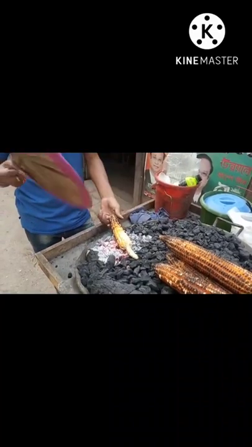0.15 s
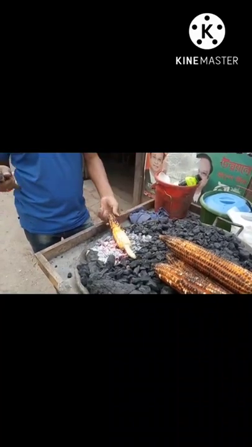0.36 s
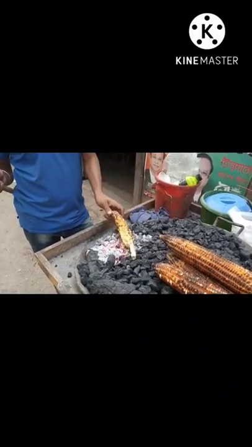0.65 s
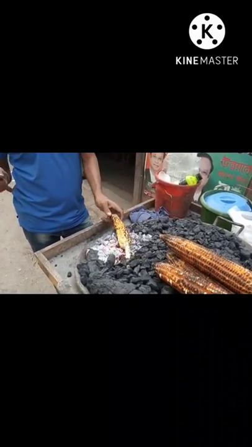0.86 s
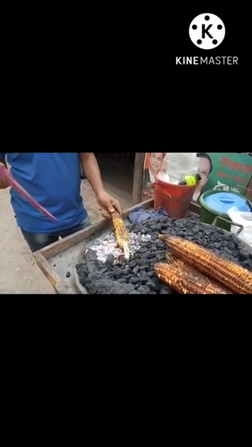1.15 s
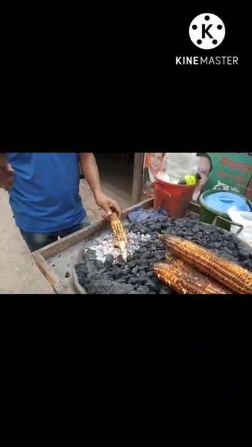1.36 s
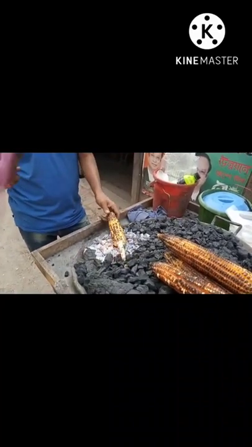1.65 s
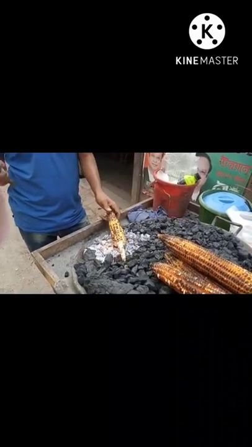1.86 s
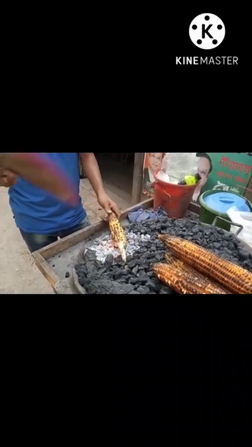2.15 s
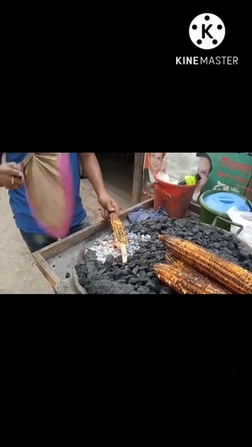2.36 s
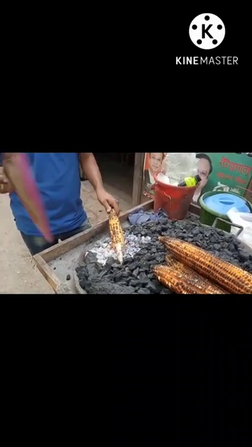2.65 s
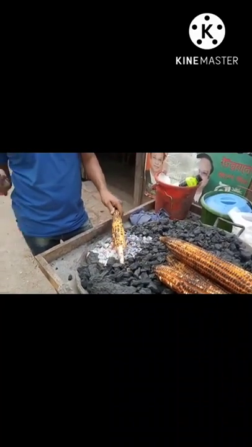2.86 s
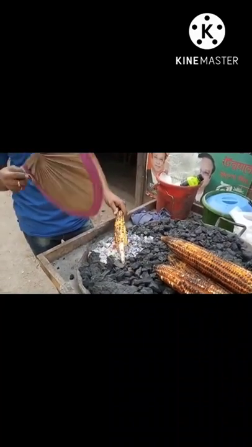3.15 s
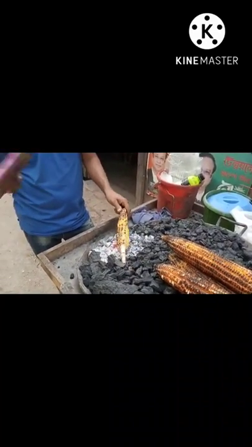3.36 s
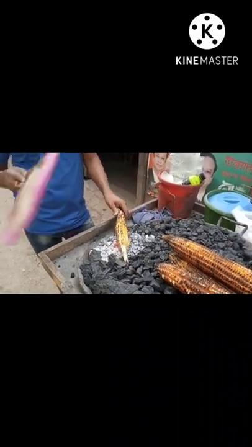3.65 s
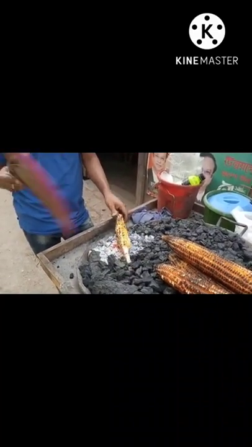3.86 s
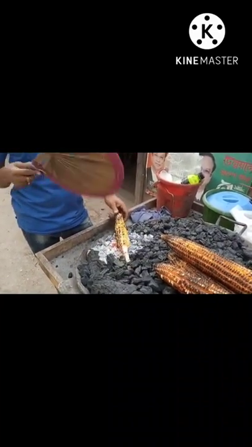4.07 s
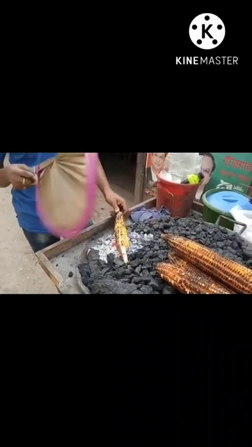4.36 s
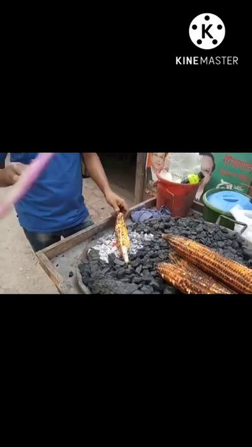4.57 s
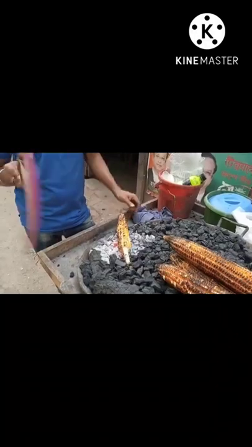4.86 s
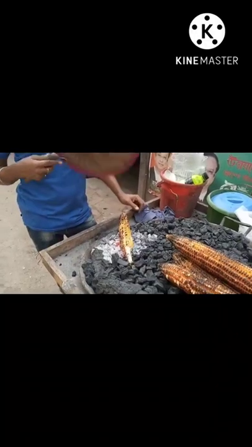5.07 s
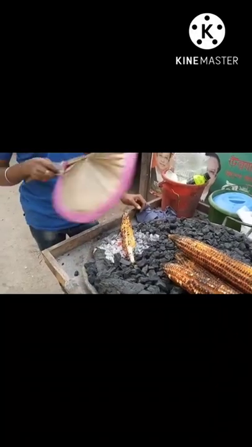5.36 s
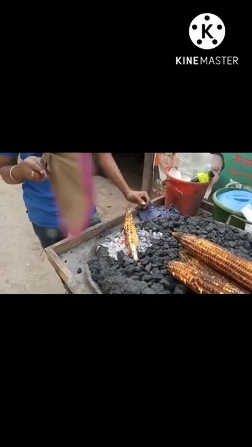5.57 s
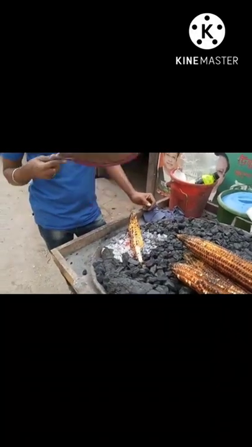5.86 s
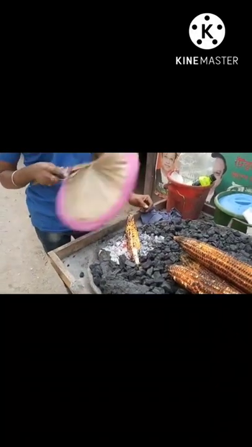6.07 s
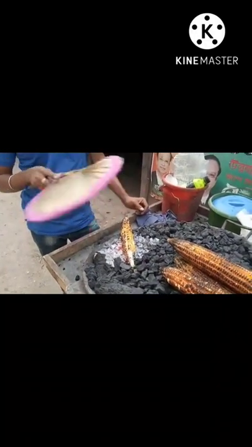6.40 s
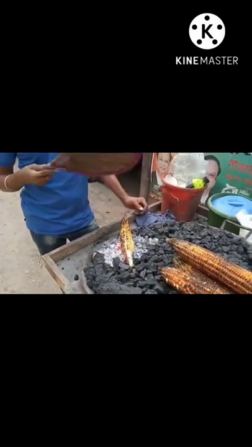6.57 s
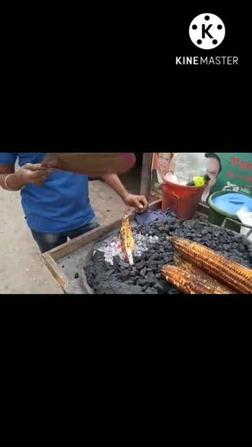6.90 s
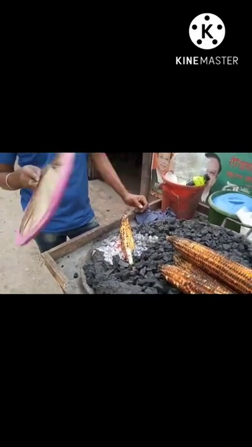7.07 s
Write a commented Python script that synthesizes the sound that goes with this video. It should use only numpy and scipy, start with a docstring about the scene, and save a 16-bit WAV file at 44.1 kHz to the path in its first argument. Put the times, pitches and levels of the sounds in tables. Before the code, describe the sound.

A hand fan clacks irregularly over hot charcoal that pops and crackles, with a soft hiss and faint street rumble.

```python
"""A street stall, where a corn cob roasts on charcoal and a hand fan is swung over the coals.
The blade clacks on its handle with a puff of air at each turn; lumps split with sharp, ringing pops
and the embers crackle. Underneath sit a soft hiss, street rumble and the fan's draught on the microphone.
The stall's walls add a short tail. Near the first second the sound drops out briefly."""
import sys
import numpy as np
from scipy import signal
from scipy.io import wavfile
from scipy.ndimage import map_coordinates

SR = 44100
rng = np.random.default_rng(int(sys.argv[2]) if len(sys.argv) > 2 else 0)


def dump(signal):
    """Clip the signal to [-1, 1] and save it as 16-bit WAV at the path in sys.argv[1]."""
    limited = np.clip(np.atleast_2d(signal).T, -1, 1)
    pcm = np.round(limited * 32767).astype(np.int16)
    wavfile.write(sys.argv[1], SR, pcm)


N = 319284

# strokes of the fan: start_s, contact_hz, knock_db, puff_db, snap_db
FAN_STROKES = [(0.1553, 1484, -34.5, -31.5, -36.5), (1.0718, 3620, -36, -45, -42.5),
               (1.1243, 3160, -32, -38, -46), (1.222, 3500, -25.5, -31.5, -33.5),
               (1.3828, 1840, -33.5, -30, -42.5), (2.078, 2730, -29, -31.5, -35.5),
               (2.4953, 3970, -35, -38, -40), (2.9549, 2340, -47.5, -54.5, -57),
               (3.176, 3200, -44, -48.5, -50), (3.2707, 1800, -32.5, -48, -37),
               (3.5016, 4130, -31.5, -29, -41), (3.5863, 2410, -39, -43, -43.5),
               (4.3548, 3370, -24, -25.5, -27.5), (4.9575, 3430, -29, -37, -36.5),
               (5.2077, 2300, -29.5, -26, -34), (5.5257, 1830, -38, -39, -44),
               (5.5339, 4050, -33, -34, -34), (6.4426, 2410, -30, -26, -34),
               (6.6425, 1220, -31.5, -27, -38), (6.8867, 3500, -30, -38, -47),
               (6.8993, 4200, -26, -32.5, -27.5)]
# undamped modes of the fan's handle: pitch_hz, gain_db, t60_s
HANDLE_MODES = [(1026, 12, 0.32), (1605, 4.5, 0.025), (1852, -6, 0.1), (2082, 12.5, 0.039), (2602, 7, 0.19),
                (3313, -7, 0.039), (3620, 15.5, 0.25), (4050, 3.5, 0.049), (4840, 2, 0.015),
                (5477, 10, 0.095), (6300, -7, 0.048), (6480, -1, 0.071), (8700, 2.5, 0.044),
                (9950, 3.5, 0.011)]
# low modes of the blade and the stall's box: pitch_hz, gain_db, t60_s
BOOM_MODES = [(98.7, -24.5, 0.39), (176.3, -18, 0.061), (199.5, -17.5, 0.26), (317.6, -23, 0.088)]
# foreground charcoal pops: start_s, fragment_hz, ring_db, crack_db
COAL_POPS = [(1.336, 2100, -38.5, -72), (1.4121, 3630, -35, -36), (1.4259, 2090, -53, -36),
             (1.4681, 1750, -30, -65), (1.5008, 5560, -23.5, -27.5), (1.6221, 4030, -43.5, -70),
             (2.1165, 3560, -27.5, -24), (2.141, 4930, -25.5, -34), (2.1509, 4070, -25.5, -29.5),
             (2.1746, 4400, -27.5, -31), (2.2447, 4500, -22, -22.5), (2.2825, 2030, -31, -43.5),
             (2.374, 2130, -30, -39), (2.6025, 4620, -37.5, -57), (2.6183, 5550, -39.5, -60),
             (2.9072, 2070, -34, -50), (3.0891, 2530, -58, -50), (3.3725, 2380, -46, -55),
             (3.466, 2260, -52, -47), (3.6273, 1680, -39.5, -68), (3.7142, 7560, -40.5, -46),
             (3.835, 1680, -50, -55), (4.2335, 2450, -48, -58.5), (4.5846, 2540, -40, -37),
             (4.6516, 4600, -30.5, -37), (4.694, 4950, -37.5, -72), (5.062, 1530, -42.5, -61),
             (4.7747, 6100, -48.5, -49), (5.084, 4400, -43, -48), (5.125, 2970, -45, -52),
             (5.3934, 1420, -42, -58), (5.4153, 4500, -46, -46), (5.2397, 1350, -22.5, -32.5),
             (5.2632, 1040, -32.5, -38), (5.2973, 1650, -43, -35), (5.3083, 2200, -36, -48),
             (5.35, 2100, -37.5, -37), (5.4294, 1760, -37.5, -66), (5.4475, 1930, -37.5, -47),
             (5.657, 1680, -42.5, -48), (5.7172, 1920, -41, -46), (5.7464, 1570, -45, -51),
             (5.852, 4100, -34, -66), (6.0532, 1940, -49, -56), (6.1729, 5800, -47, -70),
             (6.3684, 1920, -43, -59), (6.5032, 1950, -40, -58), (6.5652, 2460, -42.5, -44.5),
             (6.6609, 4180, -17.5, -19), (6.706, 4330, -32, -49), (6.724, 4500, -36, -35.5),
             (6.82, 2120, -36, -36), (6.9776, 4800, -30, -36.5), (7.0072, 4630, -35.5, -47.5),
             (7.069, 1780, -40.5, -47), (7.1368, 5505, -36, -53), (7.1692, 2440, -43.5, -41.5)]
# undamped modes of the coal bed and its pan: pitch_hz, gain_db, t60_s
PAN_MODES = [(1343, -8, 0.11), (2682, 1.5, 0.03), (4330, 12, 0.055), (5910, 6.5, 0.038), (6580, -32, 0.036),
             (9330, 8, 0.012)]
# colour of the coals' hiss: frequency_hz, density_db
HISS_SPECTRUM = [(260, -34), (450, -17.5), (550, -20.5), (709, -15), (821, -20), (991, -4), (2180, 4.5),
                 (3090, -4), (4610, 4.5), (5270, -3), (5950, -3), (7070, -8.5), (9370, 3), (11000, -19),
                 (14300, -55), (22000, -120)]
# colour of the air on the microphone: frequency_hz, density_db
DRAUGHT_SPECTRUM = [(11, -31), (18, -4.5), (48, -2.5), (76, 2), (89, 2.5), (141, -23), (170, -26.5),
                    (220, -45.5), (370, -120)]
# strength of the draught between gusts: time_s, level_db
DRAUGHT_LULLS = [(1.2, -57), (1.25, -58), (1.57, -59.5), (3.4, -63), (3.99, -52), (4.46, -66), (4.63, -72),
                 (4.83, -69), (5.15, -62.5), (6.01, -71.5), (6.4, -73), (6.55, -68), (6.83, -67),
                 (6.97, -58), (7.24, -82)]
# colour of the street's rumble: frequency_hz, density_db
STREET_SPECTRUM = [(59, -32), (100, -11), (135, -25), (227, -7), (333, -13.5), (397, -21.5), (556, -13),
                   (874, -30), (1000, -27), (1300, -32.5), (2200, -120)]
# drones of far traffic: pitch_hz, level_db
TRAFFIC_DRONES = [(104, -70), (178, -77.5)]
# the stall's reverb tail: frequency_hz, gain_db, t60_s
STALL_TAIL = [(40, -36.5, 0.36), (110, -4.5, 0.74), (220, -6.5, 0.59), (500, -3.5, 0.43),
              (1290, -9.5, 0.55), (2460, -6, 0.3), (4500, -11.5, 0.44), (10000, -8.5, 0.22)]
# stereo width of that tail: frequency_hz, side_db
TAIL_WIDTH = [(100, -9.5), (300, -4), (1500, -13.5), (5000, -12), (10000, -16)]

TIME_S, HIT_S = np.arange(N) / SR, np.arange(int(.25 * SR)) / SR   # clocks of the scene and of one hit
DROPOUT_S = (.752, 1.042)
GLOWING = TIME_S > DROPOUT_S[1]   # the coals liven up after the dropout
MIDDLE_HZ = 3000   # pivot between low and high hits
CLACK_PAN_DB, POP_PAN_DB = 1.56, 1.5   # left over right
GRIP_T60_S, BED_T60_S = .33, .15   # the hand damps the handle; the loose coal bed damps a pop


def fan():
    """The swung fan clacks at each turn of the blade."""
    out = np.zeros((2, N))
    for start_s, *stroke in FAN_STROKES:
        place(out, clack(*stroke), start_s, CLACK_PAN_DB)
    return out


def clack(hz, knock_db, puff_db, snap_db):
    """The blade knocks the handle; the point of contact colours the knock."""
    contact = burst(t60=.14, crack_db=2, crack_t60=.003, grain_db=4, side_db=-12)
    colour = resonance(contact, hz, .13 * hz)
    wood = struck(contact + 1.4 * colour, HANDLE_MODES, vary_db=6.5, detune=.0011)
    wood *= dying(HIT_S, GRIP_T60_S)
    puff = air_puff(suck_s=.0013, swell_s=.0027) + .51 * band(contact, 175, 360, order=3)
    body_db = knock_db - 5 - 3.5 * np.log2(hz / MIDDLE_HZ)   # higher contacts wake less hollow body
    layers = [(puff, puff_db),
              (band(wood, 796, 1782, order=3), body_db),
              (band(wood, 1927, 2023), knock_db - 5),   # the handle's narrow ring
              (band(wood, 2480, 5200, order=3), knock_db),
              (band(wood, 6100, 9740, order=3), snap_db)]
    return sum(set_attack(x, db, length_s=.016) for x, db in layers)


def air_puff(suck_s, swell_s):
    """The stopping blade sends a short pressure dip, a slower swell and a low boom."""
    dip, swell = HIT_S / suck_s, HIT_S / swell_s
    pulse = -dip * np.exp(1 - dip) + suck_s / swell_s * swell * np.exp(1 - swell)
    boom = sum(from_db(db) * np.sin(2 * np.pi * hz * HIT_S) * dying(HIT_S, t60)
               for hz, db, t60 in BOOM_MODES)
    return pulse - boom


def handle_ring(level_db, t60):
    """The handle is still ringing from an earlier stroke as the scene opens."""
    out = np.zeros((2, N))
    wood = struck(rng.standard_normal((2, len(HIT_S))), HANDLE_MODES, vary_db=2, detune=.002)
    ring = band(wood, 1200, 3600, order=1) * dying(HIT_S, t60)
    place(out, set_attack(ring, level_db, length_s=.02), 0, CLACK_PAN_DB)
    return out


def charcoal(faint_low_hz=1510, faint_high_hz=4700):
    """The foreground pops, plus a faint one in the wake of each stroke after the dropout."""
    out = np.zeros((2, N))
    for start_s, *split in COAL_POPS:
        place(out, pop(*split), start_s, POP_PAN_DB)
    for stroke_s, *_ in FAN_STROKES:
        if stroke_s > DROPOUT_S[1]:
            wait, height, softness = rng.random(3)
            hz = faint_low_hz * (faint_high_hz / faint_low_hz) ** height
            ring_db = -48 - 6 * softness
            place(out, pop(hz, ring_db, ring_db + 2.5), stroke_s + .09 * (.5 + wait), POP_PAN_DB)
    return out


def pop(hz, ring_db, crack_db):
    """A lump splits: the crack rings around the fragment's pitch, with a dull and a bright skirt."""
    t60 = .064 * 2 ** ((crack_db - ring_db) / 29.5)   # a crumble (more crack) outlasts a clean split
    split = burst(t60, crack_db=-2.5, crack_t60=.0051, grain_db=1.5, side_db=-10)
    crack = struck(split, PAN_MODES, vary_db=5, detune=.00094) * dying(HIT_S, BED_T60_S)
    ring = band(crack, .83 * hz, 1.2 * hz)
    dull = band(crack, 800 * (hz / MIDDLE_HZ) ** .23, .76 * hz, order=3)
    bright = band(crack, 1.085 * hz, 9140, order=3)
    bright = band(bright, 740, .414 * hz, order=1)   # tilts the top down
    # harder pops and larger, lower fragments lean to the bright skirt
    lean_db = 2 * (ring_db + 25.5) - 2 * np.log2(hz / MIDDLE_HZ)
    if hz < MIDDLE_HZ:
        lean_db = max(lean_db, 0)
    dull_db = crack_db - 10 * np.log10(1 + from_db(lean_db) ** 2)   # the skirts share the crack's power
    layers = [(ring, ring_db), (dull, dull_db), (bright, dull_db + lean_db)]
    return sum(set_attack(x, db, length_s=.0076) for x, db in layers)


def embers():
    """Fanned embers tick; after a loud pop the broken lumps shift and grind."""
    fanned = stirring(FAN_STROKES, settle_t60=1.9, full_db=-25.5)
    shifting = stirring(COAL_POPS, settle_t60=.52, full_db=-23)
    ticks_per_s = GLOWING * (14 + 60 * fanned)
    ticks = crackle(ticks_per_s, -33 + 15 * fanned, spread_db=2, low_hz=1680, high_hz=5900, cycles=7.7)
    crunch = shifting * crackle(1200, -11.5, spread_db=-.5, low_hz=1070, high_hz=7300, cycles=15)
    return band(ticks + crunch, 1300, 6100)


def crackle(per_s, click_db, spread_db, low_hz, high_hz, cycles):
    """Tiny cracks at random moments, each ringing a few cycles at one of 16 pitches."""
    fires = rng.random(N) < per_s / SR
    strength = from_db(click_db + spread_db * np.minimum(rng.exponential(1, N), 3))
    clicks = fires * strength * rng.choice([-1, 1], N)
    pitches = np.geomspace(low_hz, high_hz, 16)
    voice = rng.integers(0, len(pitches), N)
    return sum(resonance(clicks * (voice == k), hz, 2 * hz / cycles) * np.sqrt(low_hz / hz)
               for k, hz in enumerate(pitches))


def stirring(events, settle_t60, full_db):
    """How unsettled the coals are, 0-1: each event kicks them and they come to rest."""
    kicks = np.zeros(N)
    for start_s, _, level_db, *_ in events:
        kicks[int(start_s * SR)] = from_db(level_db - full_db)
    return np.minimum(signal.lfilter([1], [1, -dying(1 / SR, settle_t60)], kicks + 1e-18), 1)


def coal_hiss(flare):
    """Hot coals hiss, faintly before the dropout, and swell as they flare."""
    resting_db = np.where(GLOWING, -57.5, -74)
    gain = np.hypot(from_db(resting_db), from_db(-47) * flare)
    return gain * noise_bed(HISS_SPECTRUM, patchy_db=1.5, side_db=-10)


def draught(gust_db=7, early_db=-62.5, full_buffet_db=-40):
    """Air from the fan rumbles on the microphone; strong gusts also buffet it."""
    lull_db = np.interp(TIME_S, *np.transpose(DRAUGHT_LULLS))
    mean_db = np.where(GLOWING, lull_db + gust_db, early_db)
    gusts = from_db(mean_db + 2.5 * drift(18))
    air = noise_bed(DRAUGHT_SPECTRUM, patchy_db=2, side_db=-2)
    buffet = np.minimum(gusts / from_db(full_buffet_db), 1) * rms_one(band(air, 55, 100))
    return gusts * (rms_one(band(air, 21, 52)) + buffet)


def rumble(flare, street_db=-69, flutter_db=-47.5):
    """One low bed carries both the street's rumble and the flutter of flaring coals."""
    gain = np.hypot(from_db(street_db), from_db(flutter_db) * flare)
    return gain * noise_bed(STREET_SPECTRUM, patchy_db=2.5, side_db=-3)


def traffic(width_hz=22):
    """Far traffic drones in narrow bands of noise."""
    out = np.zeros(N)
    for hz, db in TRAFFIC_DRONES:
        hum = resonance(rng.standard_normal(N), hz, width_hz)
        out += from_db(db) * rms_one(resonance(hum, hz, width_hz))
    return out


def stall_reverb(x, build_s=.0081):
    """Walls and awning return a diffuse tail that dies sooner in the treble."""
    s = np.arange(int(.8 * SR)) / SR
    tail = 0
    for hz, noise in noise_bands(len(s), TAIL_WIDTH):
        t60 = at_hz(STALL_TAIL, hz, column=2)
        equal_energy = np.sqrt(2 * np.log(1000) / (t60 * SR))
        tail = tail + noise * dying(s, t60) * from_db(at_hz(STALL_TAIL, hz)) * equal_energy
    return signal.fftconvolve(x, tail * (1 - np.exp(-s / build_s)), axes=1)[:, :N]


def burst(t60, crack_db, crack_t60, grain_db, side_db):
    """A sharp crack, then a dying swarm of tiny contacts and near reflections, different in each ear."""
    mid, side, size = rng.standard_normal((3, len(HIT_S)))
    grains = (mid + from_db(side_db) * side * [[1], [-1]]) * from_db(grain_db * size)
    return grains * (dying(HIT_S, t60) + from_db(crack_db) * dying(HIT_S, crack_t60))


def struck(contact, modes, vary_db, detune):
    """The contact plus the modes it sets ringing, varied in strength and tuning on every hit."""
    ring = 0
    for hz, db, t60 in modes:
        strength, bend = rng.standard_normal(2)
        mode = resonance(contact, hz * (1 + detune * bend), np.log(1000) / np.pi / t60)
        ring = ring + from_db(db + vary_db * strength) * mode
    return contact + ring


def noise_bed(spectrum, patchy_db, side_db):
    """Coloured stereo noise whose bands flicker; rms 1."""
    bands = noise_bands(N, [(1, side_db)])
    return rms_one(sum(x * from_db(at_hz(spectrum, hz) + patchy_db * drift(20)) for hz, x in bands))


def noise_bands(size, width):
    """Yields centre_hz and stereo noise for each half octave; width lists frequency_hz, side_db."""
    white = rng.standard_normal((2, 2, size))
    for k, low_hz in enumerate(17 * 2 ** (np.arange(19) / 2)):
        mid, side = band(white[k % 2], low_hz, low_hz * np.sqrt(2))
        yield low_hz * 2 ** (1 / 4), mid + from_db(at_hz(width, low_hz)) * side * [[1], [-1]]


def band(x, low_hz, high_hz, order=2):
    """Causal band-pass."""
    high_hz = min(high_hz, .45 * SR)
    edges_hz = [min(low_hz, high_hz / 1.1), high_hz]
    return signal.sosfilt(signal.butter(order, edges_hz, "band", fs=SR, output="sos"), x + 1e-18)


def resonance(x, hz, width_hz):
    """Two-pole resonance with unity gain at its peak."""
    radius = np.exp(-np.pi * width_hz / SR)
    feedback = [1, -2 * radius * np.cos(2 * np.pi * hz / SR), radius ** 2]
    return signal.lfilter(np.array([1, 0, -1]) * (1 - radius ** 2) / 2, feedback, x + 1e-18)


def drift(rate_hz):
    """A slow modulator gliding between random values."""
    points = rng.standard_normal(int(rate_hz * N / SR) + 2)
    return np.interp(np.linspace(0, len(points) - 1, N), np.arange(len(points)), points)


def dying(s, t60):
    """A decay of 60 dB in t60 seconds."""
    return np.exp(-np.log(1000) * s / t60)


def set_attack(x, db, length_s):
    """Scales a hit so that its attack has the given rms level."""
    return x * from_db(db) / np.sqrt(np.mean(x[..., :int(length_s * SR)] ** 2) + 1e-20)


def place(out, hit, start_s, pan_db):
    """Pans a stereo hit and lays it on the track."""
    at = int(start_s * SR)
    out[:, at:at + hit.shape[1]] += (hit * from_db([[pan_db / 2], [-pan_db / 2]]))[:, :N - at]


def at_hz(points, hz, column=1):
    """Reads a table's column on a log-frequency axis."""
    table = np.array(points)
    return np.interp(np.log(hz), np.log(table[:, 0]), table[:, column])


def from_db(db):
    return 10 ** (np.asarray(db) / 20)


def rms_one(x):
    return x / np.sqrt(np.mean(x ** 2) + 1e-20)


def scene():
    """Clacks, pops and embers with the stall's tail, over a bed that leans slightly left."""
    hits = fan() + handle_ring(level_db=-46.5, t60=.42) + charcoal() + embers()
    tail = stall_reverb(hits)
    flare = GLOWING * stirring(FAN_STROKES, settle_t60=1, full_db=-22.5)   # strokes make the coals flare
    bed = coal_hiss(flare) + rumble(flare) + traffic() + draught()
    return hits + tail + bed * from_db([[.4], [-.4]])


def record(dry):
    """Sound reaches the left microphone port slightly late; it drops out once; the top is cut."""
    late_samples, fade_s, cutoff_hz = 1.16, .004, 10900
    left = map_coordinates(dry[0], [np.arange(N) - late_samples], order=3)
    outside_dropout_s = np.maximum(DROPOUT_S[0] - TIME_S, TIME_S - DROPOUT_S[1])
    gate = np.clip(outside_dropout_s / fade_s, 0, 1)
    high_cut = signal.ellip(10, .3, 70, cutoff_hz, fs=SR, output="sos")
    return signal.sosfilt(high_cut, np.array([left, dry[1]]) * gate)


dry = scene()
out = record(dry)
dump(out)
```